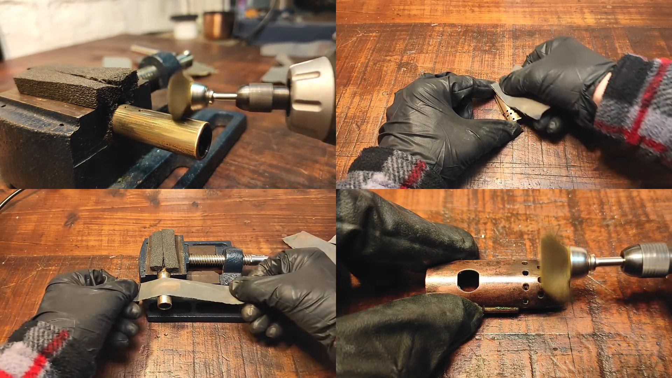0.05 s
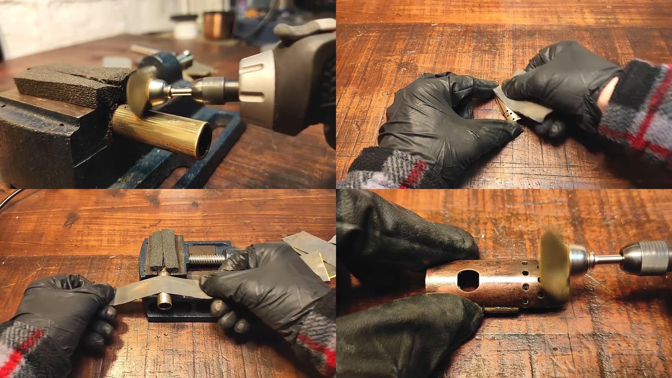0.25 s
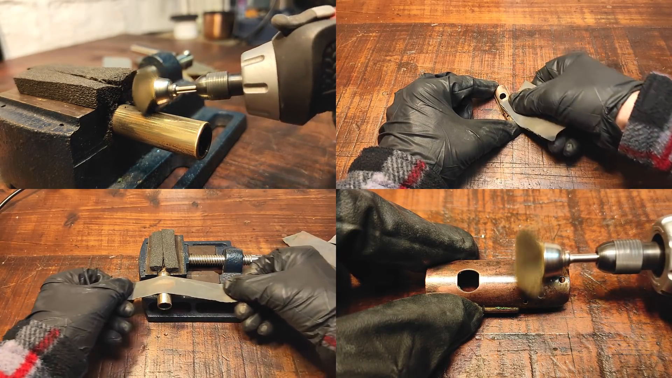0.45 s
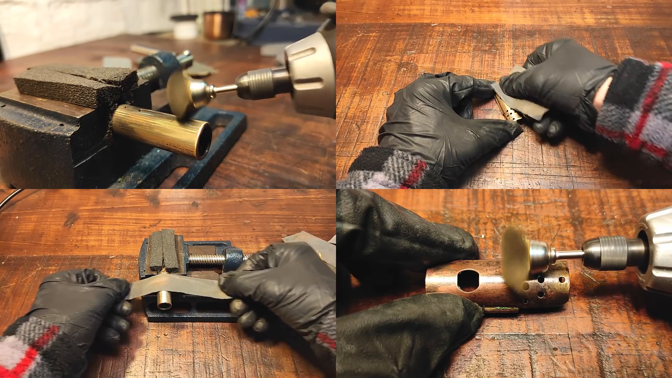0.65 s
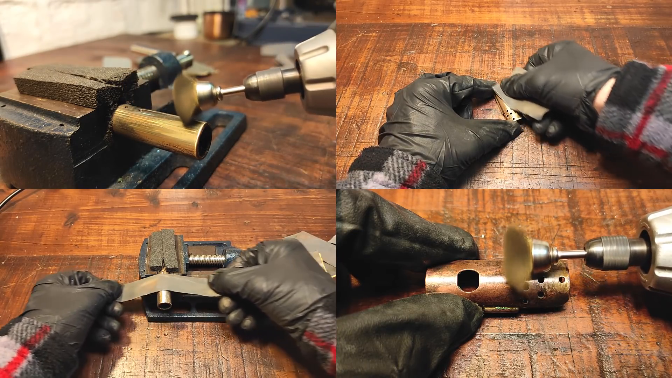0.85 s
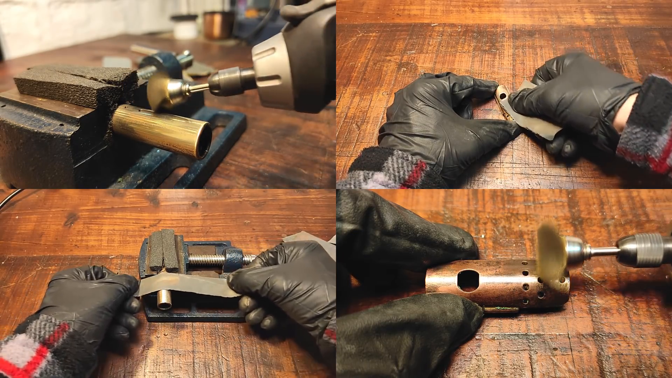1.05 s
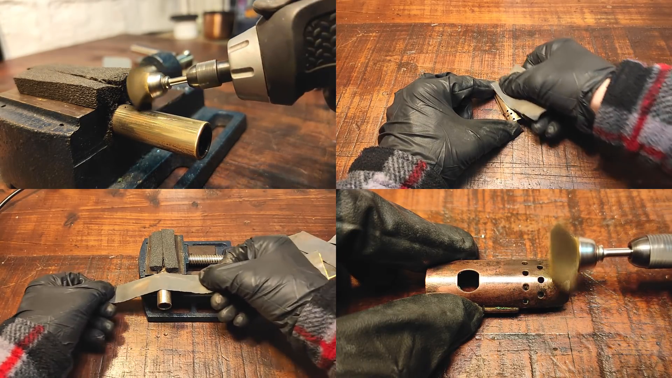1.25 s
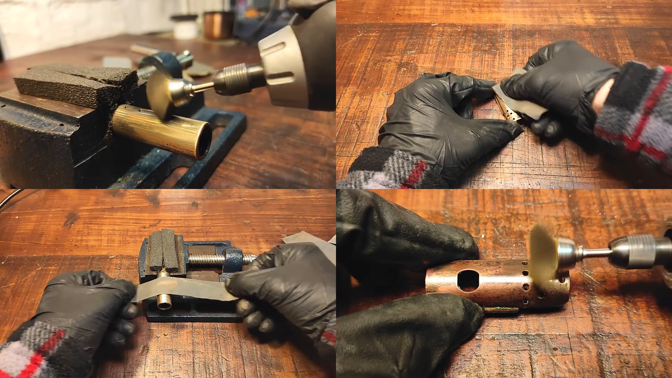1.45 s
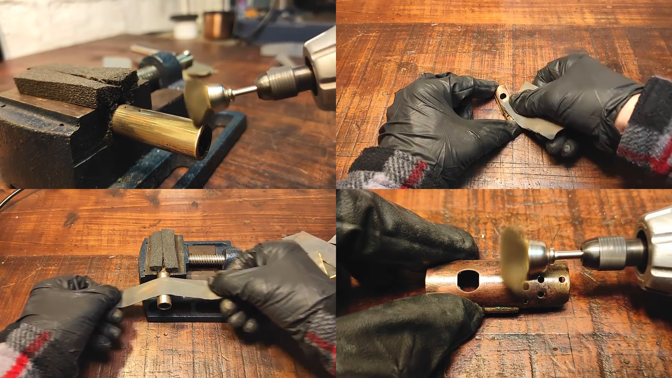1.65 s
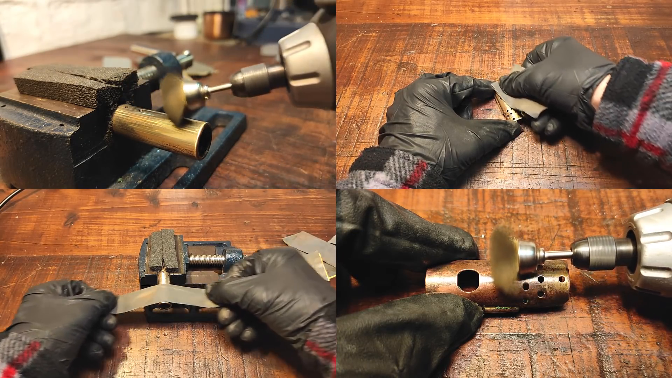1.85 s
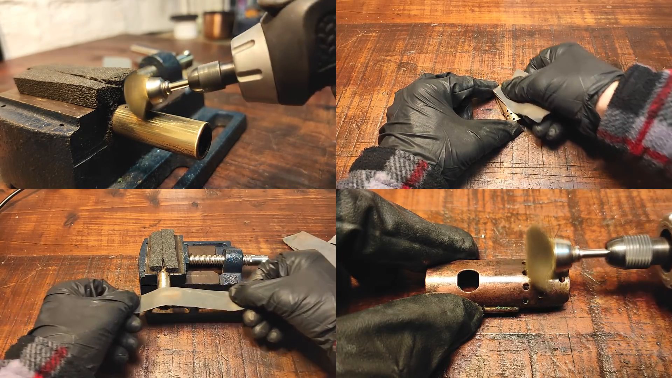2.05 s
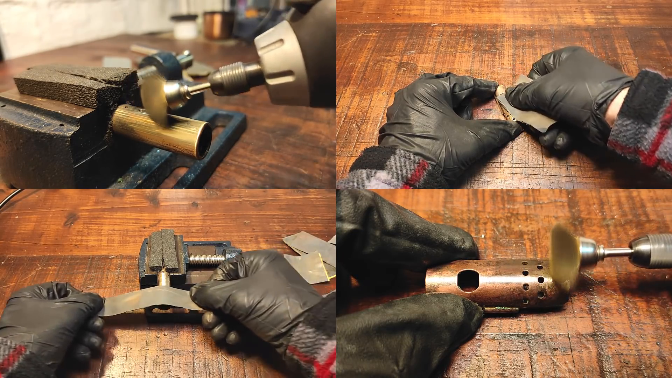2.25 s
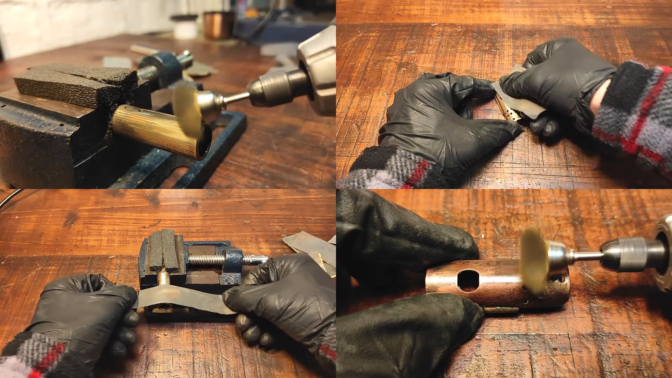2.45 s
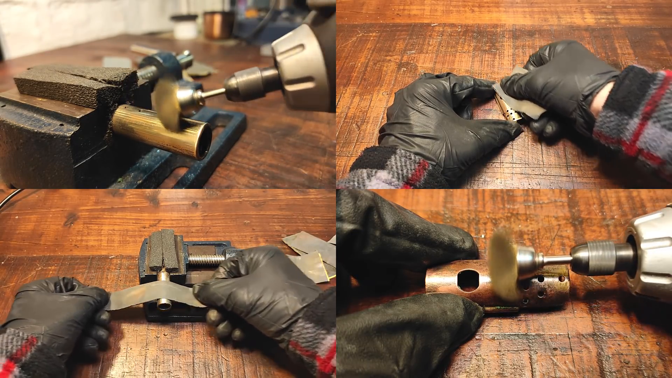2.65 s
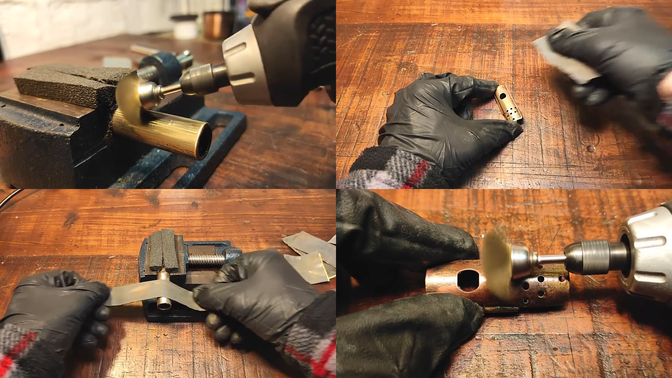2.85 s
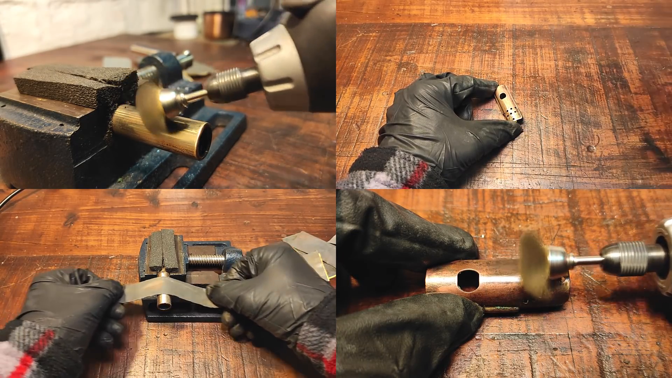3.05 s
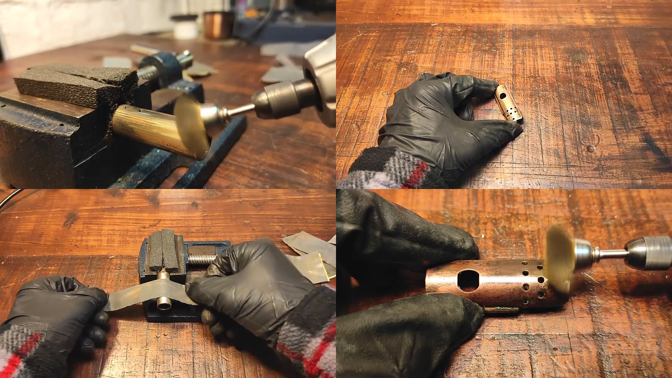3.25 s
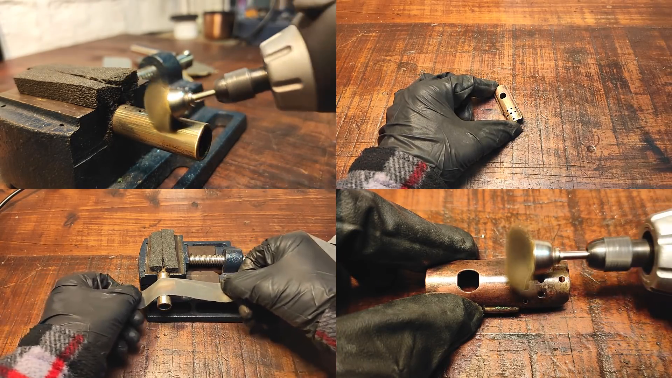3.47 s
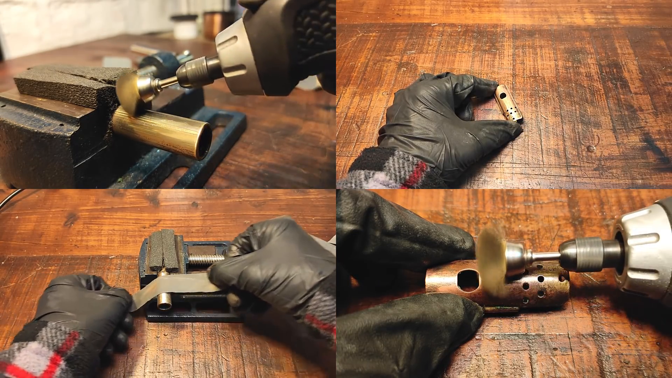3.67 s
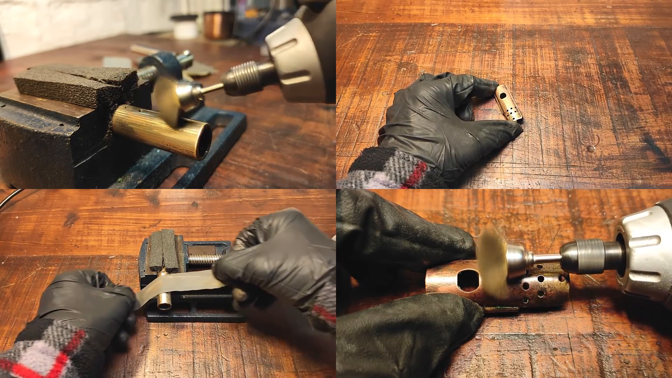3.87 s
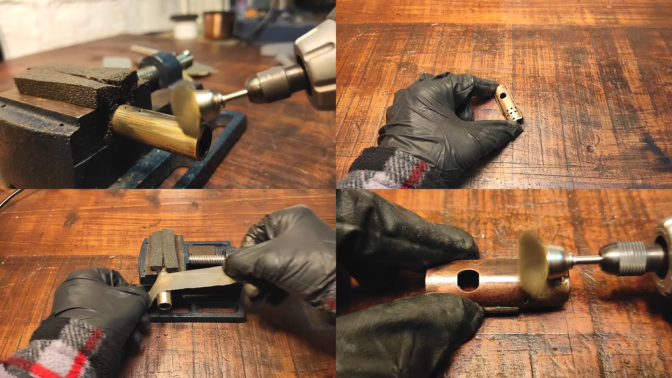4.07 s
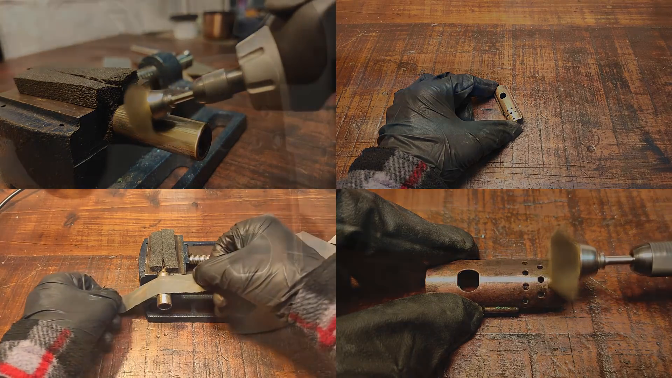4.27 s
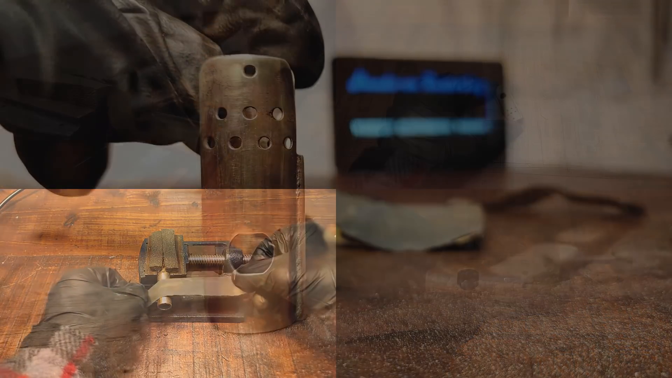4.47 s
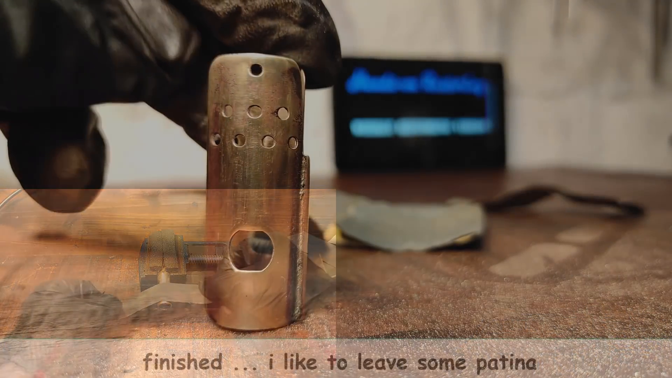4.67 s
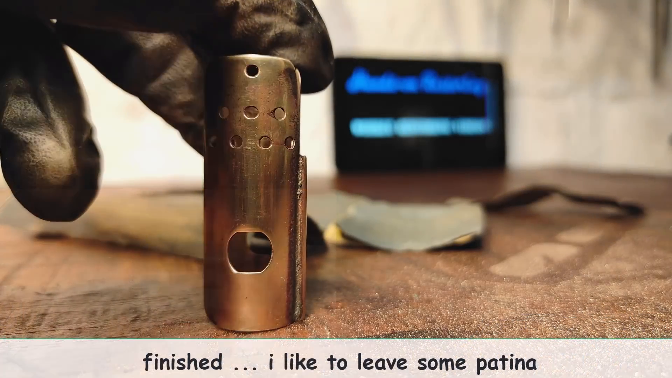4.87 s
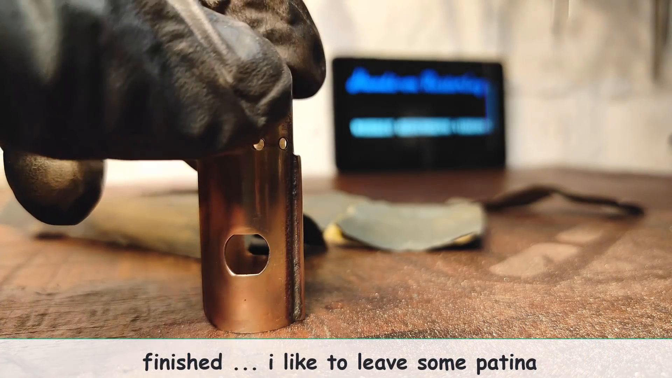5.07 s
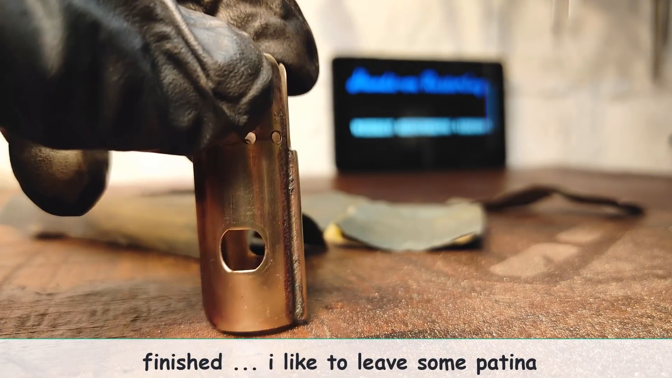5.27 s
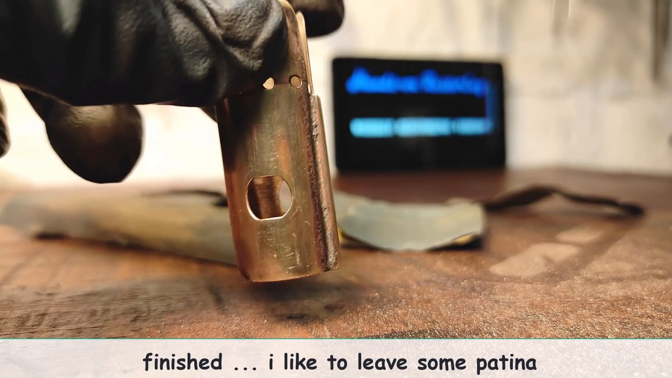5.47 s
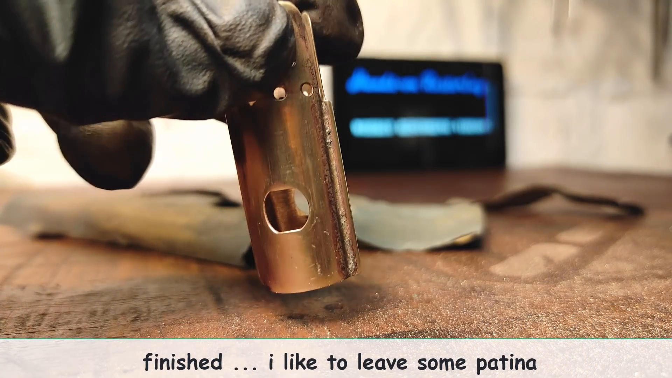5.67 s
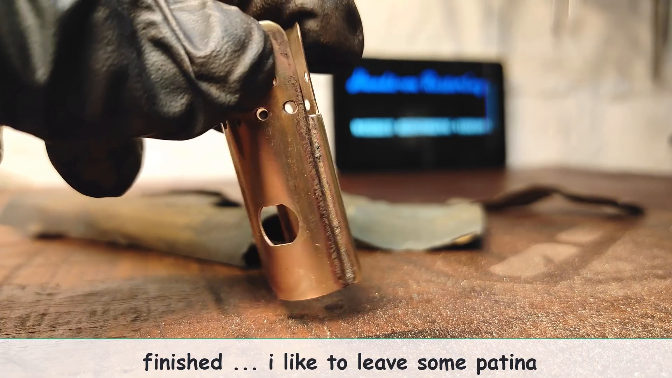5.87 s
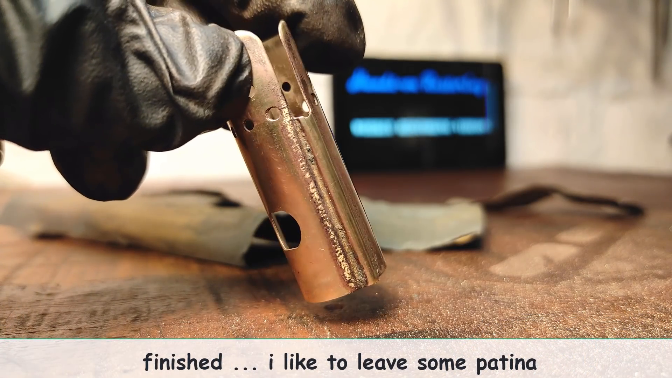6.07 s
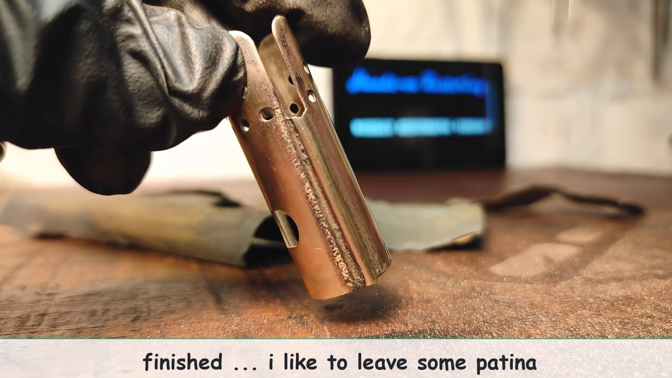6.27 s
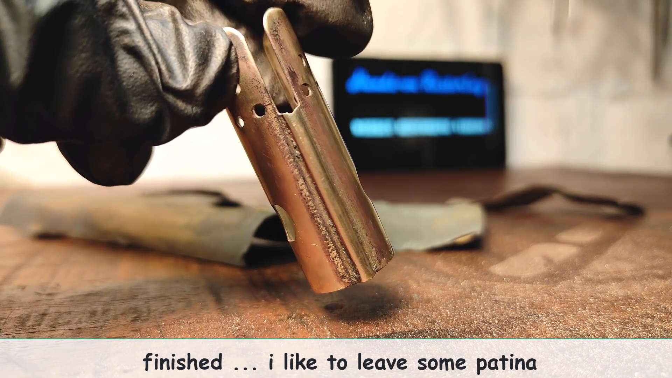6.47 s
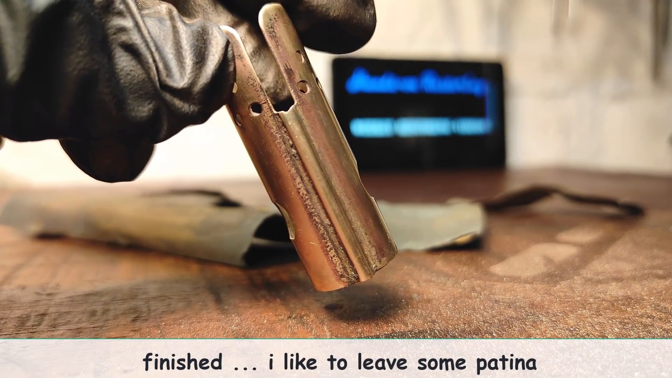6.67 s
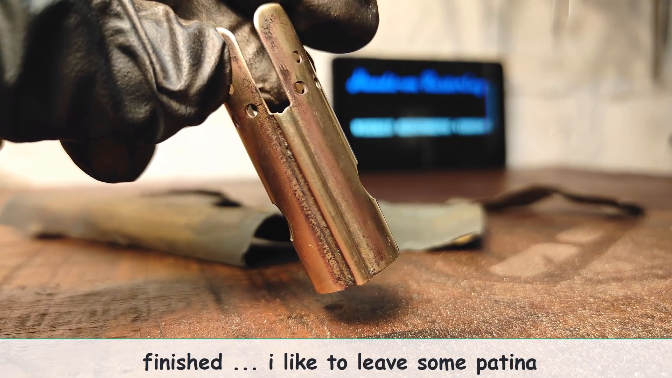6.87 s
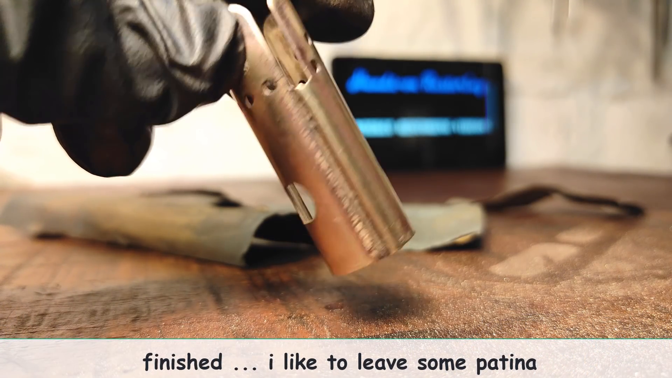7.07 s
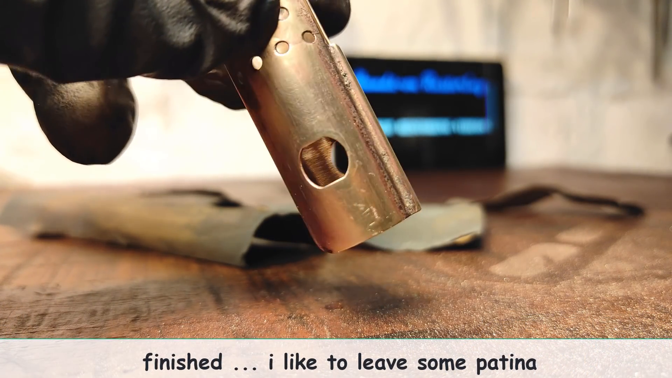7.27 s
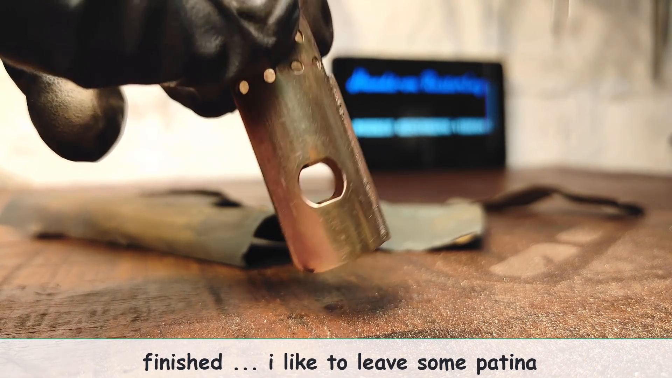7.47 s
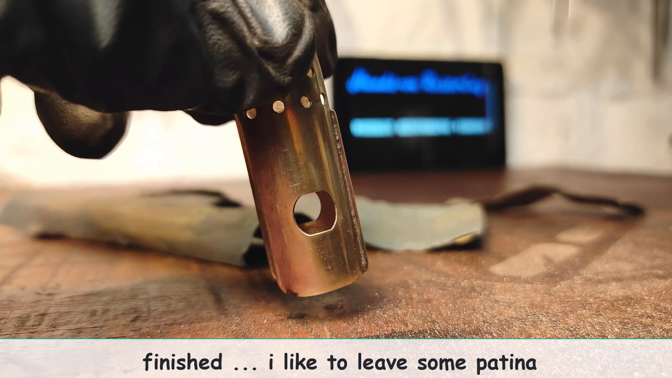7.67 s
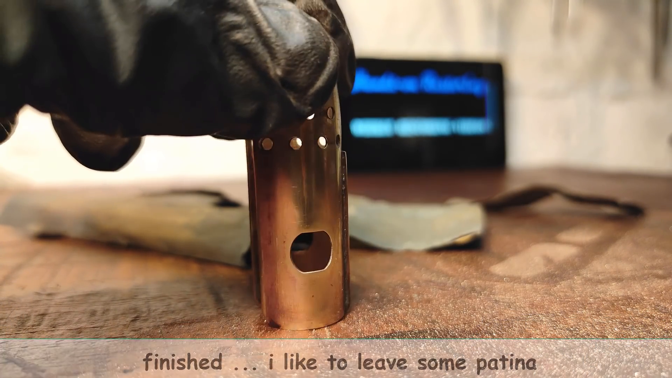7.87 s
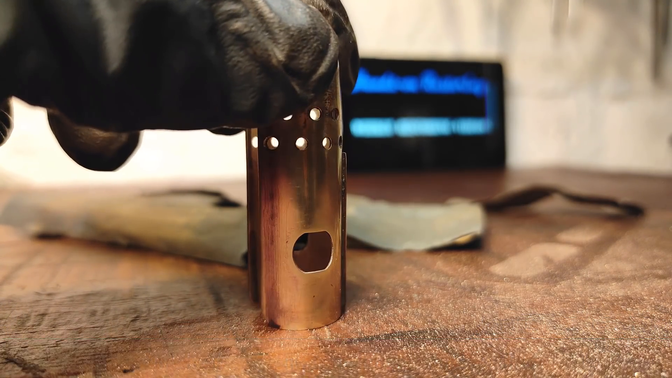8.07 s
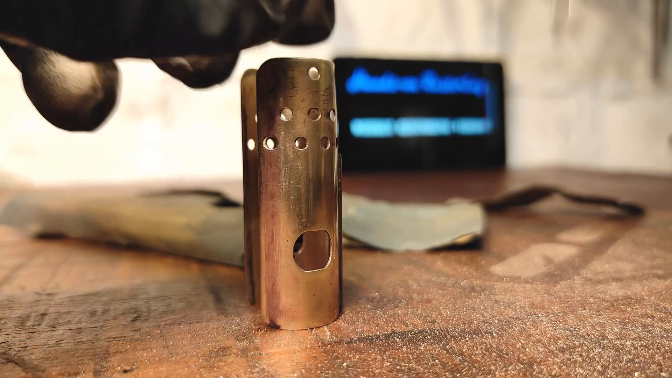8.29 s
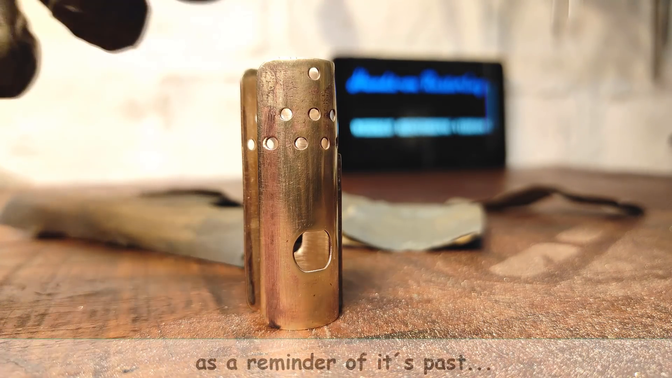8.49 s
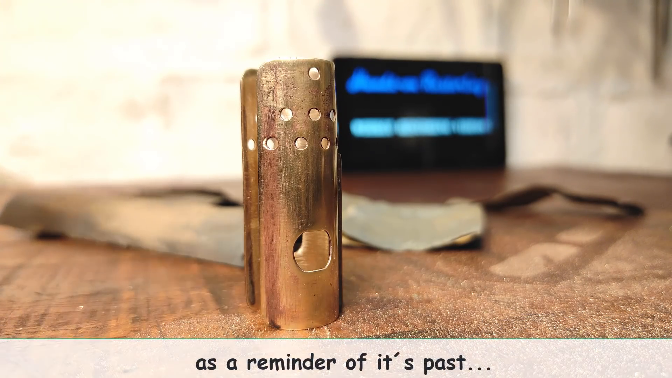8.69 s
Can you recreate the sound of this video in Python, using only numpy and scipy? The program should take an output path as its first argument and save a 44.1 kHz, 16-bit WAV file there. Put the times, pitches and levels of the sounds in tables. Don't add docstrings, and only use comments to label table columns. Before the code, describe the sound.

On the left a power drill drones steadily, its abrasive wheel hissing on a brass tube; on the right sandpaper rasps back and forth about six times a second. Soft vice bumps. Then a sudden cut to a quiet room: rubber gloves rustle and snap on the right, a tube knocks on wood, a far engine slowly climbs in pitch, and the tube is set down with a ringing clunk. Close stereo microphone, bright and slightly resonant.

```python
import sys
import numpy as np
from scipy import signal
from scipy.fft import rfft, irfft, next_fast_len
from scipy.io import wavfile
from scipy.ndimage import uniform_filter1d, map_coordinates

SR = 44100
rng = np.random.default_rng(int(sys.argv[2]) if len(sys.argv) > 2 else 0)


def store_pcm(level_fs):
    pcm = np.round(np.clip(level_fs, -1, 1) * 32767).astype(np.int16)
    wavfile.write(sys.argv[1], SR, np.atleast_2d(pcm).T)


def field_ratio(decibels):
    return 10 ** (np.asarray(decibels, dtype=float) / 20)


N = 384993
TIME_S = np.arange(N) / SR
CUT_S = 4.563


def unit(x):
    return x / np.sqrt(np.mean(x ** 2, axis=-1, keepdims=True) + 1e-20)


def along(points, hz):
    f, v = np.transpose(points)
    return np.interp(np.log(hz + 1), np.log(f + 1), v)


def curves(rows):
    s, *cols = np.transpose(rows)
    return [np.interp(TIME_S, s, c) for c in cols]


def wobble(rate_hz):
    knots = rng.standard_normal(int(N * rate_hz / SR) + 4)
    return map_coordinates(knots, [np.arange(N) * rate_hz / SR])


def filtered(x, response):
    m = next_fast_len(N + SR // 2)
    return irfft(rfft(x, m) * response(np.fft.rfftfreq(m, 1 / SR)), m)[..., :N]


def scratch(spectrum, grain_db, alike):
    size = np.minimum(rng.exponential(size=(3, N)), 2.5)
    own = rng.standard_normal((3, N)) * field_ratio(grain_db * size)
    alike = np.clip(alike, 0, 1)
    pair = np.sqrt(alike) * own[2] + np.sqrt(1 - alike) * own[:2]
    return unit(filtered(pair, lambda hz: field_ratio(along(spectrum, hz))))


def sides(pan_db):
    return field_ratio([[pan_db / 2], [-pan_db / 2]])


# t/s, f/Hz
SHAFT = [(0, 124.7), (.26, 125.6), (.62, 124.8), (.89, 125.6), (1.14, 123), (1.36, 127), (1.72, 123.6),
         (1.95, 125.8), (2.12, 123.8), (2.35, 125.2), (2.75, 122.1), (3.14, 124.5), (3.42, 122.9),
         (3.59, 121), (3.82, 123.3), (4.02, 121.8), (4.2, 123), (4.56, 121.2)]


def shaft():
    shaft_hz, = curves(SHAFT)
    return shaft_hz, 2 * np.pi * np.cumsum(shaft_hz) / SR


# shaft multiple, level/dB
HUM = [(1, -12.5), (2, -2), (3, -13), (4, -10), (5, -16.5), (6, -28.5), (7, -14.5), (8, -9.5), (9, -11.5),
       (10, -12.5), (11, -14.5), (14, -19.5), (18, -15), (24, -15)]
# t/s, shaft f/Hz, second multiple level/dB
CLAMP = [(0.0, 124.1, -62), (0.24, 125.6, -59), (0.96, 125.4, -58), (1.17, 123.7, -65), (1.39, 128.3, -57),
         (1.56, 121.6, -58.5), (1.61, 126.5, -58), (1.74, 123.5, -62.5), (2.39, 125.1, -57),
         (2.46, 120.8, -59), (2.52, 124.7, -56.5), (2.84, 122.2, -58.5), (3.12, 125.3, -59),
         (3.66, 121.1, -59.5), (3.78, 122.7, -61.5), (4.55, 123.8, -58.5)]
# shaft multiple, level/dB
MESH = [(35, -62.5), (37, -60.5), (58, -81), (66, -59.5), (68, -77.5), (69, -60), (74, -61)]


def motor(shaft_hz, turn, pressure_db):
    free_hz, drain_hz_per_s, teeth = 128.1, 0.28, 38
    load_hz = free_hz - drain_hz_per_s * TIME_S - shaft_hz
    whine_db = -63.5 + 1.5 * load_hz
    hum_db = -55.5 - 0.22 * load_hz
    clamp_db = curves(CLAMP)[1] + 59
    loosening_db = 2.5 * (TIME_S - CUT_S / 2)
    hum = 0
    for k, db in HUM:
        sway_db = clamp_db if k == 2 else 0.86 * np.sqrt(k) * wobble(7.3)
        if k == 3:
            sway_db = sway_db + loosening_db
        phase = 0.0081 * k * k * wobble(40) + rng.uniform(0, 2 * np.pi)
        hum = hum + field_ratio(db + sway_db) * np.sin(round(k) * turn + phase)
    mesh = 0
    for k, db in MESH:
        mesh = mesh + field_ratio(db + 2.25 * wobble(16)) * np.sin(round(k) * turn + 0.78 * wobble(70))
    whine = field_ratio(whine_db - 1.0 + 2.87 * wobble(19)) * np.sin(teeth * turn + 2.0 * wobble(90))
    tones = field_ratio(hum_db + 7.0) * hum + whine + field_ratio(pressure_db + 38.5) * mesh
    return tones * field_ratio([[0], [-15]])


# f/Hz, level/dB per Hz
BRISTLES = [(300, -8.5), (2000, -1), (4000, -6.5), (6000, 6), (9000, 3), (13000, -2), (16000, -7.5)]


def wheel(turn, pressure_db):
    beat = 1 + 0.2 * np.cos(turn) + 0.14 * np.cos(2 * turn + 0.9) + 0.34 * np.cos(3 * turn + 2.2)
    bite = field_ratio(pressure_db - 9.5 + 0.9 * wobble(25.27)) * beat
    return bite * scratch(BRISTLES, grain_db=1.5, alike=0) * field_ratio([[0], [-21]])


# f/Hz, level/dB per Hz
HOUSING = [(20, -6.5), (100, -7.5), (300, 2), (700, -4), (1100, 3), (1500, -1), (2200, -7.5), (4000, -17),
           (16000, -27)]


def housing(pressure_db):
    flutter = field_ratio(0.8 * wobble(9))
    level = field_ratio(-50.5 + 0.43 * (pressure_db + 32.0)) * flutter
    body = level * scratch(HOUSING, grain_db=2.0, alike=0.46)
    body[0] = np.roll(body[0], shift=-7)
    return body * field_ratio([[0], [-8]])


def bench():
    spectrum = [(20, 2.0), (70, 0.5), (150, -12.0), (400, -36.5)]
    return field_ratio(-65.5 + 2.9 * wobble(4.3)) * scratch(spectrum, grain_db=4.5, alike=0.76) * sides(1.2)


# t/s, level/dB
WHEEL = [(.02, -38), (.3, -38), (.938, -34), (1.167, -37.5), (1.4, -40), (1.606, -35), (1.846, -35.5),
         (1.941, -34.5), (2.18, -38), (2.659, -35), (2.799, -36.5), (2.883, -38.5), (3.003, -37),
         (3.547, -35), (3.727, -40.5), (3.8, -40), (4.106, -36.5), (4.53, -38.5)]


def drill():
    shaft_hz, turn = shaft()
    pressure_db, = curves(WHEEL)
    return motor(shaft_hz, turn, pressure_db) + wheel(turn, pressure_db) + housing(pressure_db) + bench()


# turn t/s, level/dB, level left at the turn/dB, fastest at share of stroke
STROKES = [(0, -35.5, -40.5, 0.22), (0.126, -37, -48, 0.44), (0.259, -36, -40, 0.54),
           (0.406, -37, -43.5, 0.44), (0.553, -33.5, -42.5, 0.38), (0.707, -35, -45.5, 0.49),
           (0.852, -32.5, -59, 0.42), (1.007, -32.5, -55, 0.5), (1.165, -32, -60, 0.34),
           (1.318, -34, -50, 0.55), (1.452, -34, -43, 0.48), (1.598, -34.5, -43, 0.41),
           (1.751, -33.5, -42.5, 0.35), (1.914, -35.5, -41, 0.54), (2.038, -34, -43.5, 0.51),
           (2.215, -35, -45.5, 0.53), (2.363, -34.5, -49, 0.45), (2.525, -36.5, -48, 0.61),
           (2.67, -32.5, -40, 0.43), (2.871, -34, -47.5, 0.76), (3.044, -37, -51.5, 0.41),
           (3.212, -39.5, -52.5, 0.46), (3.371, -38.5, -47, 0.48), (3.555, -38, -44.5, 0.56),
           (3.712, -38.5, -50, 0.4), (3.89, -42.5, -51.5, 0.55), (4.058, -40, -59, 0.48),
           (4.22, -40.5, -52, 0.6), (4.403, -40, -53, 0.37), (4.6, -42, -45.5, 0.45)]
# f/Hz, level/dB per Hz
GRIT = [(300, -10.5), (1500, -5), (3300, -0.5), (6000, 2.5), (10000, 1.5), (13500, -1), (16000, -7.5)]


def sandpaper():
    turn_s, db, stop_db, lean = np.transpose(STROKES)
    place = np.interp(TIME_S, turn_s, np.arange(len(turn_s)) * (1 - 1e-9))
    row, u = place.astype(int), place % 1
    bent = u ** (np.log(0.5) / np.log(np.clip(lean[row], 0.15, 0.85)))
    stroke = field_ratio(db[row]) * np.sin(np.pi * bent) ** 1.23
    stop = field_ratio(np.interp(place, np.arange(len(db)), stop_db)) * np.cos(np.pi * bent) ** 2
    grit = scratch(GRIT, grain_db=3.0, alike=0)
    return (stroke + stop) * field_ratio(-6.5 + 1.9 * wobble(40)) * grit * field_ratio([[-9], [0]])


# t/s, peak level/dB, swell/s
BUMPS = [
    (0.355, -55, 0.016),
    (0.777, -52, 0.0067),
    (1.042, -47, 0.016),
    (1.519, -54, 0.013),
    (1.741, -48, 0.013),
    (1.782, -50, 0.012),
    (2.563, -54, 0.0042),
    (3.911, -48, 0.013),
    (3.925, -39, 0.014),
    (4.254, -34.5, 0.013),
]


def vice():
    out, t = np.zeros(N + SR), np.arange(SR // 8) / SR
    top = np.sin(2 * np.pi * 470 * t) + 0.36 * np.sin(2 * np.pi * 330 * t)
    low = 0.33 * np.sin(2 * np.pi * 80 * t) + 0.44 * np.sin(2 * np.pi * 185 * t)
    for s, db, swell_s in BUMPS:
        u = t / max(swell_s, 0.002)
        thud = np.exp(-t / 0.019) * (1 - np.exp(-u)) * low
        out[round((s - 0.006) * SR):][:len(t)] += field_ratio(db) * (1.53 * u * np.exp(-u * u) * top + thud)
    return out[:N] * sides(-1.44)


# t/s, f/Hz
ENGINE = [(4.57, 46.1), (4.9, 48.74), (5.41, 51.34), (5.74, 54.56), (6.12, 59), (6.72, 65.03), (7.44, 72.1),
          (8.03, 75.7), (8.73, 81.8)]
ORDERS_DB = [0.5, 0.5, -0.5]
# f/Hz, width/Hz, level/dB
STANDING = [(47.8, 2.5, -71), (54.7, 2.5, -59.5), (60.4, 4.3, -65), (64.8, 6, -55), (68.2, 5.9, -59.5),
            (81.5, 4.4, -63.5), (93.2, 24, -67.5), (123, 14, -76), (152.5, 6.1, -59.5), (175.4, 12, -76.5),
            (244, 11, -71.5)]


def engine():
    def swell(f):
        return np.sqrt(sum(field_ratio(2 * db) / (1 + (2 * (f - hz) / width) ** 2) ** 2 for hz, width, db in STANDING))

    firing_hz, = curves(ENGINE)
    turn = 2 * np.pi * np.cumsum(firing_hz) / SR
    out = 0
    for k, db in enumerate(ORDERS_DB, 1):
        level = field_ratio(db + 1.0 + 1.6 * wobble(6.1)) * swell(k * firing_hz)
        out = out + level * np.sin(k * turn + 0.24 * wobble(10))
    return out


# f/Hz, level/dB
WHINES = [(5200, -114), (6955, -108), (7840, -116), (8452, -116)]
# f/Hz, level/dB per Hz
ROOM_TONE = [(20, 1), (60, -21), (200, -10), (400, -18.5), (700, -24.5), (1500, -32.5), (3300, -37.5),
             (6000, -45), (9000, -52), (12000, -72), (16000, -52)]


def quiet_room():
    whine = 0
    for hz, db in WHINES:
        whine = whine + field_ratio(db + 2.3 * wobble(8)) * np.sin(2 * np.pi * hz * TIME_S + 3.3 * wobble(60))
    tone = field_ratio(-68.0 + 0.23 * wobble(3.8)) * scratch(ROOM_TONE, grain_db=0.0, alike=0)
    low = [(20, 2.0), (70, -2.0), (160, -22.5), (300, -23.0), (500, -36), (900, -90)]
    rumble = field_ratio(-68.5 + 2.8 * wobble(2.48)) * scratch(low, grain_db=0.0, alike=0.75)
    return (engine() + rumble) * sides(3.2) + whine + tone * sides(0.54)


def fading_db(rows, rest_db):
    s, rise, fall, db = np.transpose(rows)[:, :, None]
    hop = 32
    t = np.arange(0, N + hop, hop) / SR
    away = np.where(t < s, (s - t) / np.maximum(rise, 0.01), (t - s) / np.maximum(fall, 0.01))
    strongest = np.maximum((db - 20 * away).max(axis=0), rest_db)
    return np.interp(np.arange(N) / hop, np.arange(len(t)), strongest)


# peak t/s, rise/s, fall/s, level/dB, left minus right/dB
RUSTLES = [(4.585, .1, 0.26, -61, -20), (4.684, 0.13, 0.23, -44, -20), (4.777, 0.32, 0.44, -44.5, -20),
           (4.93, 0.94, 0.14, -44.5, -15), (5.02, .05, .1, -59, -16), (5.089, .12, 0.04, -60.5, -14),
           (5.16, .06, .06, -63, -17), (5.205, 0.083, 0.066, -55.5, -17), (5.231, 0.04, 0.025, -51.5, -10),
           (5.31, .1, 0.11, -70, -7), (5.37, 0.031, 0.034, -62, -5), (5.44, .06, .1, -59, -10),
           (5.47, 0.096, 0.14, -56.5, -12), (5.575, 0.024, 0.11, -54, -2), (5.62, 0.098, 0.026, -51.5, -8),
           (5.777, 0.12, 0.092, -52.5, -9.5), (6.011, 0.11, 0.28, -67.5, -10),
           (7.293, 0.56, 0.27, -68, -10), (7.401, 0.24, 1.3, -71.5, -8), (7.949, 0.072, .22, -63.5, -6),
           (8.301, .21, 0.19, -67.5, -2.5), (8.7, 0.25, 0.52, -60, -15)]
# f/Hz, level/dB per Hz
RUBBER = [(1200, -33), (2800, -13.5), (4000, 0), (8000, -2), (11500, -7.5), (13000, -14), (16000, -19)]


def rustle():
    rest_left_db, rest_right_db = -81, -78.5
    left = [(s, rise, fall, db + pan_db) for s, rise, fall, db, pan_db in RUSTLES]
    right = np.array(RUSTLES)[:, :4]
    level_db = np.array([fading_db(left, rest_left_db) - 0.5, fading_db(right, rest_right_db)])
    return field_ratio(level_db - 10.5 + 1.85 * wobble(60)) * scratch(RUBBER, grain_db=2.0, alike=0.076)


# peak t/s, rise/s, fall/s, level/dB
DRAGS = [(4.585, 0.14, 0.063, -63), (4.777, .25, .45, -70), (4.86, .15, .15, -59.5),
         (4.949, 0.41, 0.23, -59.5), (5.231, 0.066, .06, -59), (5.37, .026, 0.03, -64),
         (5.458, .1, .27, -73), (5.602, .054, 0.083, -66.5), (5.777, .28, .146, -69),
         (7.293, 0.59, .25, -75), (7.949, 0.032, .3, -66.5), (8.7, .44, .45, -76)]


def drag():
    drag_db = fading_db(DRAGS, rest_db=-83)
    spectrum = [(150, 0.5), (400, -3.5), (1000, -9.0), (2500, -5), (5000, -20.5)]
    return field_ratio(drag_db - 5.0 + 0.43 * wobble(30)) * scratch(spectrum, grain_db=3.0, alike=0.064)


# t/s, peak level/dB, left minus right/dB
TICKS = [(4.6297, -49, -19), (4.8438, -45, -12), (4.9568, -36, -13), (4.9979, -52, -15), (5.136, -51, -21),
         (5.158, -56, -14), (5.1935, -59, -13), (5.234, -44, -1), (5.236, -39.5, 0), (5.3661, -60, -7),
         (5.413, -64, -8), (5.5646, -62, -7), (5.5731, -55, -5), (5.7138, -64, -8), (5.751, -55, -12),
         (5.7717, -46, -17), (5.8545, -63, -6), (5.8999, -64, -5), (5.9389, -64.5, -7), (5.9992, -68, -8),
         (6.4695, -67, -3), (6.7711, -62, -8), (7.01, -58, -10), (8.6889, -67, -11)]


def gloves():
    out = rustle() + drag()
    t = np.arange(SR // 50) / SR
    band = signal.butter(4, [4500, 10000], "band", fs=SR)
    for s, db, pan_db in TICKS:
        snap = rng.standard_normal((2, len(t))) * field_ratio(-60 * t / 0.0076)
        snap = signal.lfilter(*band, snap)
        out[:, round(s * SR):][:, :len(t)] += field_ratio(db - 5.5) * sides(pan_db) * snap
    return out


# f/Hz, t60/s
ROOM = [(200, 0.35), (800, 0.45), (1600, 0.26), (4000, 0.36), (10000, 0.029)]


def walls(x):
    hz, t, z = signal.stft(rng.standard_normal((2, SR // 2)), SR, nperseg=256)
    decay = field_ratio(-60 * t / along(ROOM, hz)[:, None])
    tail = signal.istft(z * decay, SR, nperseg=256)[1]
    delayed = np.pad(x, (300, 0))[None]
    return signal.fftconvolve(delayed, tail / np.linalg.norm(tail[0]), axes=1)[:, :N]


def wood(peaks):
    def response(f):
        total = 0
        for k, (hz, width, db) in enumerate(peaks):
            loss = 1j * f * width
            total = total + (-1) ** k * field_ratio(db) * loss / (hz * hz - f * f + loss)
        return total
    return response


# t/s, blow level/dB, brass ring level/dB, left minus right/dB, hardness f/Hz
KNOCKS = [(4.957, -79, -30, -8, 3000), (5.06, -74, -30, -4, 1800), (5.135, -54, -34, -6, 397),
          (5.2321, -51, -30, 1, 1500), (5.2345, -43.5, -30, -4, 1570), (5.246, -48.5, -42, 13, 610),
          (5.27, -62, -40, 0, 900), (5.295, -66, -40, 0, 800), (5.358, -66, -30, 3, 1500),
          (5.364, -64.5, -32, -6, 1280), (5.373, -52, -31, -3, 496), (5.6, -67, -26, -17, 600),
          (5.766, -73, -30, -15, 3020), (6.468, -62, -27, 3, 450), (7.951, -39, -17, 3.5, 2600),
          (7.957, -45, -8, -9.5, 2190), (7.964, -43.5, -18, 3, 1290), (7.973, -46, -17.5, -7, 900),
          (8.24, -82.5, 2.5, -3, 593), (8.299, -52.5, -25, 2, 400), (8.32, -58, -30, -1, 400),
          (8.343, -60, -30, 3, 500), (8.355, -63, -30, -12, 700), (8.367, -46, -45, 2, 297),
          (8.378, -63.5, -21, -2, 600)]
# f/Hz, level/dB, t60/s
BRASS = [(3000, -9, 0.23), (5060, -4, 0.088), (6218, -6, 0.17), (7300, -16, 0.3), (7709, -13, 0.22),
         (8000, -18, 0.1), (8613, -20, 0.059)]
# f/Hz, width/Hz, level/dB
WOOD = [(260, 39, -7), (365, 29, -4), (450, 62, 0.5), (530, 61, 7), (720, 56, 8), (1120, 99, 7),
        (1740, 190, 0.5), (1950, 220, 0), (2170, 220, -7), (3200, 760, -11.5)]
# f/Hz, width/Hz, level/dB
WOOD_NEAR = [(290, 50, -3.5), (400, 68, -1), (536, 45, 6), (696, 42, 9.5), (900, 230, 0), (1240, 160, -3),
             (1680, 150, -0.5), (2000, 200, -6), (2380, 300, -11), (3100, 750, -12), (4500, 1200, -8)]


def tube():
    blows, ring, t = np.zeros((2, N + SR)), np.zeros((2, N + SR)), np.arange(SR // 3) / SR
    for s, db, ring_db, pan_db, hard_hz in KNOCKS:
        start = round(s * SR)
        gain = field_ratio(db) * sides(pan_db)
        rough = rng.standard_normal(len(t)) + 1.1 * rng.standard_normal((2, len(t)))
        rough = rough * field_ratio(-60 * t / 0.028)
        soft = signal.butter(3, min(hard_hz, SR / 3), fs=SR)
        blows[:, start:][:, :len(t)] += gain * signal.lfilter(*soft, rough)
        modes = 0
        for hz, level_db, t60_s in BRASS:
            decay = field_ratio(level_db + rng.normal(0, 1.2) - 60 * t / t60_s)
            modes = modes + decay * np.sin(2 * np.pi * hz * (t + start / SR))
        clink = field_ratio(-11.5) * modes + field_ratio(3.5) * uniform_filter1d(rough, size=2)
        ring[:, start:][:, :len(t)] += gain * field_ratio(ring_db) * clink
    blows, ring = blows[:, :N], ring[:, :N]
    moved = np.arange(N) > 7 * SR
    knock = filtered(blows * ~moved, wood(WOOD)) + filtered(blows * moved, wood(WOOD_NEAR))
    direct = ring + field_ratio(15.5) * knock
    spread = field_ratio(-5.0) * direct + field_ratio(13.5) * blows
    return direct + field_ratio(-13.5) * walls(spread.mean(axis=0))


def scene():
    after = np.clip((TIME_S - CUT_S) / 0.0008, 0, 1)
    workshop = drill() + sandpaper() + vice()
    return (1 - after) * workshop + after * (quiet_room() + gloves() + tube())


def low_pass(x):
    return signal.sosfilt(signal.butter(12, 15600, fs=SR, output="sos"), x)


# f/Hz, level/dB
PORT_LEFT = [(3000, 0), (6200, 1), (7400, 4), (8000, 13), (8450, 17.5), (8900, 13), (9250, 10.5),
             (9700, 6.5), (10400, -2.5), (11200, 0.5), (15000, -9)]
# f/Hz, level/dB
PORT_RIGHT = [(3000, -1), (5000, 0), (6200, 6.5), (7200, 14.5), (8000, 8), (9000, 2.5), (9700, -7.5),
              (10400, -5), (11000, -7), (15000, -7.5)]


def record(dry):
    ports = filtered(dry, lambda hz: field_ratio([along(PORT_LEFT, hz), along(PORT_RIGHT, hz)]))
    return low_pass(ports)


dry = scene()
out = record(dry)
store_pcm(out)
```